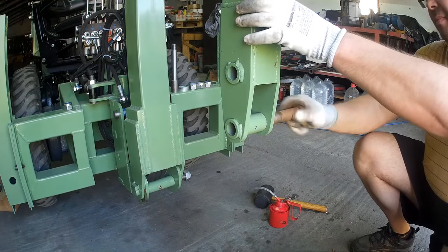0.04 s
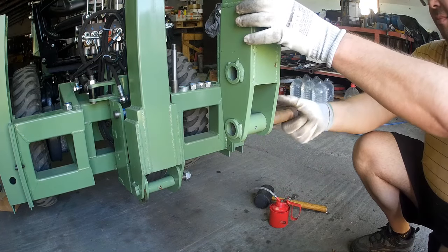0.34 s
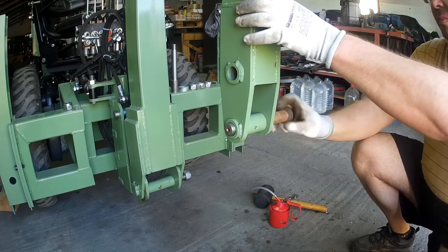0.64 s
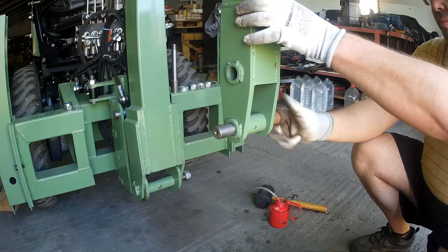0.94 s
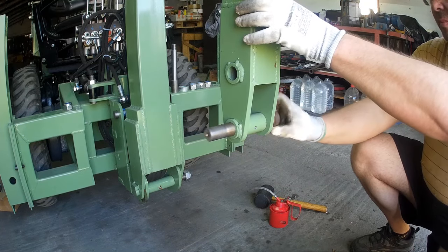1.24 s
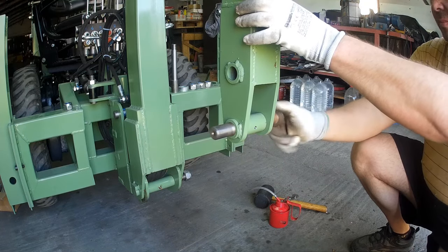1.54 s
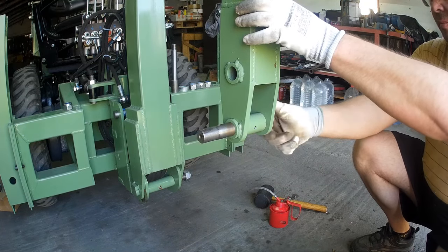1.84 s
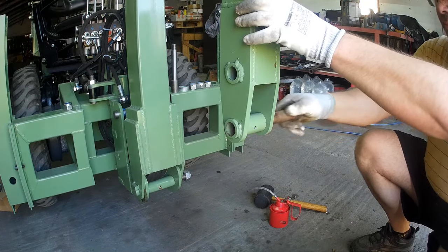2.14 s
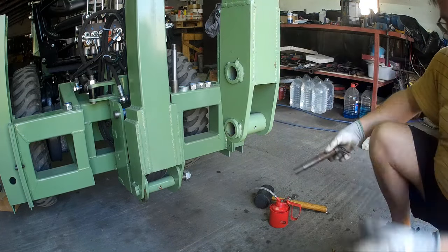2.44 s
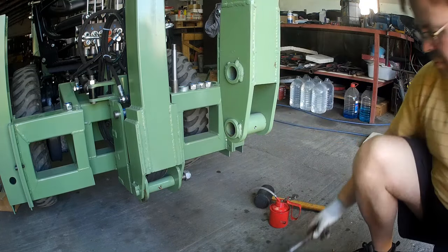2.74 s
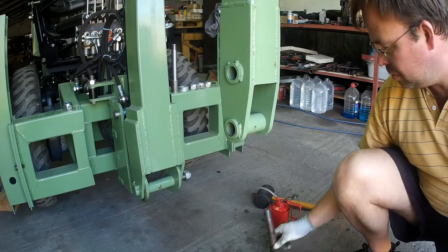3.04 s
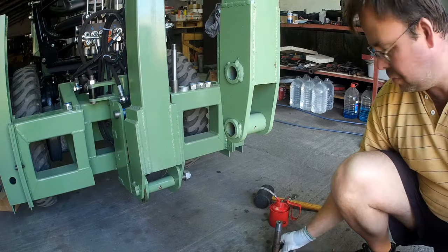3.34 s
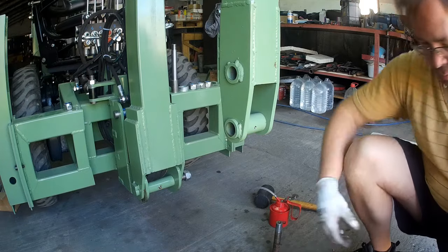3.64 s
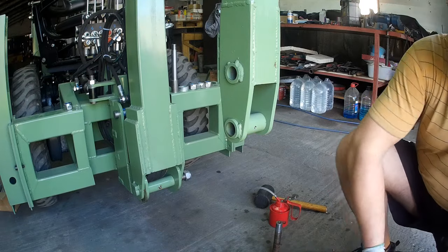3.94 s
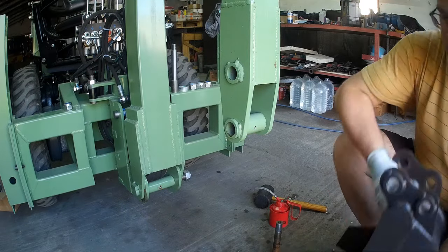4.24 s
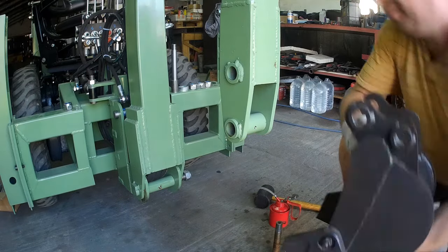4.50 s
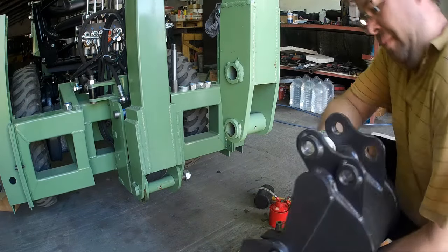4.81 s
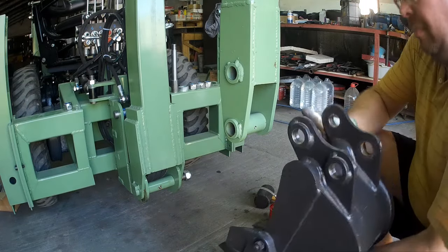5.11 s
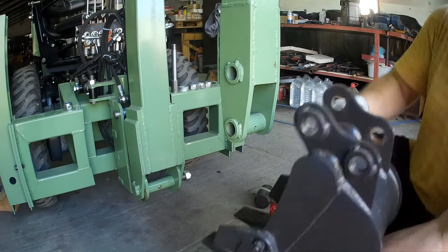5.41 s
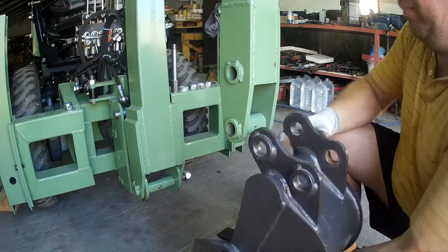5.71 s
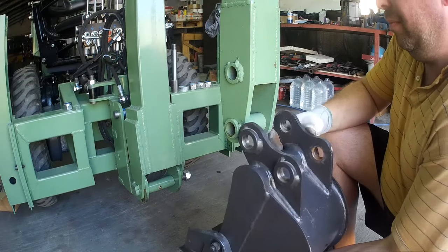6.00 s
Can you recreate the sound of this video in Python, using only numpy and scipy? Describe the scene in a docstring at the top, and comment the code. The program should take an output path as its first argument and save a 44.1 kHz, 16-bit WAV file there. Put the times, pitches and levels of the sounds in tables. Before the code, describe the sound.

A steel pin scrapes and taps faintly in its bore, then a heavy steel bucket knocks once with a short ring.

```python
"""A workshop with little echo, one microphone close to the work, a steady low rush and fine hiss behind. A
steel drift pushes a pivot pin out of a digger arm: it scrapes in the bore, taps twice, muffled, and clinks as
it comes free at 2.2 s. Shoes shuffle on the floor. At 4 s a heavy steel bucket is picked up: it rocks with two
soft knocks, then knocks hard with a short ring of its plates, drags its edge faintly on the concrete, knocks
lightly at 4.7 s and again, harder, at 5.56 s, and bumps softly as it is carried over."""
import sys
import numpy as np
from scipy import signal
from scipy.fft import rfft, irfft, next_fast_len
from scipy.io import wavfile
from scipy.ndimage import map_coordinates

SR = 44100
rng = np.random.default_rng(int(sys.argv[2]) if len(sys.argv) > 2 else 0)


def generate_wav(sig):
    """Save sig (samples, or channels by samples) to the path in sys.argv[1] as 16-bit PCM at SR."""
    pcm = np.round(np.clip(np.atleast_2d(sig).T, -1, 1) * 32767).astype(np.int16)
    wavfile.write(sys.argv[1], SR, pcm)


N = 276020

# The steel drift's modes in the bore. Each row: frequency in Hz, level in dB, t60 in seconds.
DRIFT_MODES = [(1582, -6.5, .045), (1880, -11, .045), (2130, -13, .04), (2305, -3, .08), (2480, -7, .035),
               (2600, -3, .045), (2800, -9, .035), (3080, -11, .05), (3250, -8, .04), (3480, -13, .04),
               (3700, -12, .04), (4940, -15, .05), (5200, -17, .04), (6100, -16, .05), (6610, -19, .05),
               (7100, -18, .05), (7490, -13, .045), (7770, -15, .05), (8100, -17, .05), (8570, -17, .05)]
MOUTH_S = 2.14  # the drift reaches the mouth of the bore


def amp(db):
    """Decibels to gain."""
    return 10 ** (np.asarray(db) / 20)


def unit(x):
    """x at rms 1."""
    return x / np.sqrt(np.mean(x ** 2) + 1e-20)


def along(points, hz):
    """Read a curve of (Hz, value) points on a log frequency axis."""
    point_hz, values = np.transpose(points)
    return np.interp(np.log(hz + 1), np.log(point_hz + 1), values)


def add(track, start_s, sound):
    """Mix a sound into the track from start_s on."""
    part = track[max(round(start_s * SR), 0):][:len(sound)]
    part += sound[:len(part)]


def filtered(x, response):
    """Shape x by a gain that is a function of frequency in Hz."""
    size = next_fast_len(len(x) + SR // 4)
    hz = np.fft.rfftfreq(size, 1 / SR)
    return irfft(rfft(x, size) * response(hz), size)[:len(x)]


def softened(x, cut_hz):
    """A soft contact passes no highs."""
    return signal.sosfilt(signal.butter(4, min(cut_hz, SR / 3), fs=SR, output="sos"), x)


def burst(t60):
    """A second of noise that dies away."""
    return rng.standard_normal(SR) * amp(-60 * np.arange(SR) / SR / t60)


def ring(modes, tilt_db, scatter_db, rise_cycles):
    """Damped modes, each swelling over its first cycles, at slightly new strengths for every blow."""
    t = np.arange(SR) / SR
    hz, db, t60 = np.transpose(modes)[:, :, None]
    db = db + tilt_db * np.log2(hz / np.median(hz)) + scatter_db * rng.standard_normal(hz.shape)
    rise = 1 - np.exp(-t * hz / rise_cycles)
    swings = amp(db - 60 * t / t60) * rise * np.sin(2 * np.pi * hz * t)
    return (-1) ** np.arange(len(modes)) @ swings  # neighbouring rows start in opposite directions


def room_tone(level_db=-56, wander_db=-0.07):
    """The workshop's steady low rush and fine hiss, wandering very slightly in level."""
    # The background's spectrum. Each row: frequency in Hz, relative density in dB.
    spectrum = [(12, -36), (20, -7), (38, -3.5), (70, -2), (98, -2), (196, -0.5), (306, -0.5), (452, -2),
                (491, -3), (534, -2.5), (881, -6), (2210, -15.5), (2540, -17), (3750, -22), (5500, -24.3),
                (9000, -26.4), (15500, -27.5)]
    wander = map_coordinates(rng.standard_normal(32), [np.arange(N) * 3 / SR], mode="mirror")
    rush = filtered(rng.standard_normal(N), lambda hz: amp(along(spectrum, hz)))
    return amp(level_db + wander_db * wander) * unit(rush)


def slips(length_s, grain_db, catch_db, catches_per_s=164):
    """Friction over one stroke: uneven slips that swell and fade, clumping where the faces catch."""
    t = np.arange(SR // 2) / SR
    catches = map_coordinates(rng.standard_normal(256), [t * catches_per_s], mode="mirror")
    noise = rng.standard_normal(len(t))
    roughness = amp(grain_db * rng.standard_normal(len(t)) + catch_db * catches)
    return unit(noise * roughness) * np.sin(np.pi * np.minimum(t / length_s, 1))


def rubbed(friction, ringing):
    """A body sings along with the friction that excites it."""
    return signal.fftconvolve(friction, ringing / np.linalg.norm(ringing))[:len(friction)]


def chatter(friction, tilt_db, ring_db, hiss_db):
    """Tiny slips excite the drift's modes, with the hiss of the rubbing faces between them."""
    # Steel rubbing on steel. Each row: frequency in Hz, relative density in dB.
    spectrum = [(700, -30), (1550, -4), (3650, 0), (4200, -12), (5250, -13), (6100, -16), (6900, -10.5),
                (8100, -10), (10000, -29), (15000, -60)]
    ringing = ring(DRIFT_MODES, tilt_db, scatter_db=1.5, rise_cycles=.8)
    hiss = filtered(friction, lambda hz: amp(along(spectrum, hz) + tilt_db * np.log2(hz / 3500 + 0.37)))
    return amp(ring_db) * rubbed(friction, ringing) + amp(hiss_db) * hiss


def drift_scrapes(rim_db=-7):
    """Each twist rasps in the bore; at the mouth the drift also drags over the rim and rings it."""
    # The hand's uneven twists. Each row: middle and length in seconds, level in dB, tilt in dB per octave.
    twists = [(0.008, 0.032, -58.5, -2.5), (0.106, 0.03, -59, 0.5), (0.173, 0.035, -57, -3),
              (.385, .05, -65, -4), (0.546, .06, -64, 0), (.75, .06, -62, -5), (1.125, 0.087, -59, -5),
              (1.285, 0.059, -57.5, -2), (1.333, 0.041, -59, -7), (1.37, 0.059, -60, -2),
              (1.418, 0.051, -57.5, -1.5), (1.47, .04, -65.5, -4), (1.517, 0.049, -59.5, 2.5),
              (1.547, 0.062, -59.5, 0.5), (1.627, 0.055, -57.5, -2.5), (1.719, 0.042, -58, 3),
              (1.749, 0.035, -57.5, -6), (1.81, 0.079, -57.5, 1), (2.008, 0.06, -60, 3),
              (2.038, 0.06, -59.5, -1), (2.171, 0.027, -57, -8), (2.184, 0.035, -57.5, 6.5),
              (2.206, 0.034, -58.5, 4.5), (2.25, .028, -56, 7)]
    # The rim of the bore. Each row: frequency in Hz, relative level in dB, t60 in seconds.
    rim_modes = [(3600, -3, .015), (5180, 1, .02), (5380, 2, .025), (5930, -2, .02), (7480, -2, .035),
                 (8010, -3, .035), (8600, -6, .03)]
    out = np.zeros(N)
    for middle_s, length_s, db, tilt_db in twists:
        friction = slips(length_s, grain_db=3.5, catch_db=1.5)
        rasp = chatter(friction, tilt_db, ring_db=-11, hiss_db=8)
        if middle_s > MOUTH_S:
            rim = ring(rim_modes, tilt_db=0, scatter_db=1, rise_cycles=2)
            rasp += amp(rim_db) * rubbed(friction, rim)
        add(out, middle_s - length_s / 2, amp(db) * rasp)
    return out


def drift_taps(bore_cut_hz=3000, free_cut_hz=13000):
    """The drift hits the bore with a muffled tick and rattles briefly; once free, its tip rings high."""
    # The drift's contacts. Each row: start in seconds, level in dB, tilt in dB per octave,
    # tip ring in dB relative to that level.
    contacts = [(1.1906, -47.3, -4.5, -38), (1.8615, -47, -2.5, -30), (1.8675, -54, -2, -30),
                (2.2319, -49.5, -.5, 5), (2.2465, -56, 4, -6)]
    # The drift's tip. Each row: frequency in Hz, level in dB, t60 in seconds.
    tip_modes = [(3432, -5, .075), (6848, 1, .15), (7490, -17, .08)]
    out = np.zeros(N)
    for start_s, db, tilt_db, tip_db in contacts:
        cut_hz = bore_cut_hz if start_s < MOUTH_S else free_cut_hz
        blow = softened(ring(DRIFT_MODES, tilt_db, scatter_db=1, rise_cycles=1.5), cut_hz)
        tip = amp(tip_db) * ring(tip_modes, tilt_db=0, scatter_db=1, rise_cycles=3)
        rattle = chatter(burst(t60=0.075), tilt_db, ring_db=-7, hiss_db=7)
        add(out, start_s, amp(db) * (blow + tip + rattle))
    return out


def floor_bumps(rise_s=0.0061):
    """Shoes and load bump and shuffle on the floor: low thuds with no ring."""
    # The thuds. Each row: start in seconds, level in dB, cut-off in Hz, t60 in seconds.
    thuds = [(2.7, -56, 330, 0.32), (3.245, -51, 352, 0.32), (3.36, -54.5, 350, .7),
             (4.109, -44, 120, 0.14), (4.721, -52, 260, 0.17), (5.573, -47.5, 120, 0.16)]
    out, t = np.zeros(N), np.arange(SR) / SR
    for start_s, db, cut_hz, t60 in thuds:
        rumble = unit(softened(rng.standard_normal(SR), cut_hz))
        envelope = amp(db - 60 * t / t60) * (1 - np.exp(-t / rise_s))
        add(out, start_s, rumble * envelope)
    return out


def bucket_knocks(soft_cut_hz=346, hard_cut_hz=3250, fringe_db=-17):
    """Each blow ticks and rings the plates; grit under the edge crunches, with a faint bright fringe."""
    # The welded plates, damped by the hands. Each row: frequency in Hz, level in dB, t60 in seconds.
    # Close twin modes beat, so the low ring swells after the blow.
    plate_modes = [(146, -31.5, .29), (192, -26, .12), (230, -17, .09), (312, -7.2, .044), (494, -40, .186),
                   (570, -13.6, .023), (626, -49.8, 1.33), (695, -17, .052), (800, -24, .03),
                   (807, -52.5, .82), (971, -24.5, .054), (1085, -31, .042), (1405, -36, .034),
                   (1520, -44.5, .33), (1840, -37, .03), (2003, -47, .28), (2285, -57, .25),
                   (2400, -34, .033), (2431, -51.7, .27), (2563, -51, .22), (2702, -42, .17),
                   (2834, -49, .11), (2982, -45.5, .3), (3117, -53.4, .2), (3221, -44.3, .21),
                   (627.25, -49.8, 1.33), (808.7, -52.5, .82)]
    # Blows on the bucket. Each row: start in seconds, then the levels of plates, crunch and tick in dB.
    blows = [(4.068, -24.5, -73, -65), (4.081, -24, -58, -65), (4.1108, 0, -41, -38),
             (4.718, -34, -59, -56), (5.5648, -24.5, -55, -33.5), (5.5724, -42, -57, -35),
             (5.5775, -35, -62, -43)]
    # The edge's tick on concrete. Each row: frequency in Hz, relative density in dB.
    tick_spectrum = [(250, -25), (580, 1), (1150, -4), (1550, 2), (2300, 3), (2650, -4), (3500, -4),
                     (4000, -12), (4600, -28), (15000, -50)]
    out = np.zeros(N)
    grit_band = signal.butter(8, [400, 3400], "band", fs=SR, output="sos")
    for start_s, db, crunch_db, tick_db in blows:
        cut_hz = soft_cut_hz + (hard_cut_hz - soft_cut_hz) * amp(db) ** 2  # harder blows are brighter
        plates = softened(ring(plate_modes, tilt_db=0, scatter_db=.3, rise_cycles=.6), cut_hz)
        grit = signal.sosfilt(grit_band, burst(t60=0.15))
        fringe = amp(fringe_db) * softened(burst(t60=.13), cut_hz=8000)
        tick = filtered(burst(t60=0.014), lambda hz: amp(along(tick_spectrum, hz)))
        add(out, start_s, amp(db) * plates + amp(crunch_db) * (grit + fringe) + amp(tick_db) * tick)
    return out


def bucket_drags(width_hz=250):
    """As the bucket lifts, its edge rasps faintly on the concrete, in a narrow band."""
    # The edge's strokes. Each row: middle and length in seconds, level in dB, band centre in Hz.
    strokes = [(4.381, .07, -64, 2370), (4.488, 0.037, -65, 1730)]
    out = np.zeros(N)
    band_gain = np.sqrt(SR / 2 / width_hz)
    for middle_s, length_s, db, centre_hz in strokes:
        friction = slips(length_s, grain_db=3, catch_db=-2)
        rasp = filtered(friction, lambda hz: np.exp(-((hz - centre_hz) / width_hz) ** 2))
        add(out, middle_s - length_s / 2, amp(db) * band_gain * rasp)
    return out


def workshop_reverb(x, delay_s=0.011):
    """The room's diffuse answer; each frequency dies at its own speed."""
    # The room's decay. Each row: frequency in Hz, t60 in seconds.
    decay_times = [(150, 0.17), (1000, 0.11), (8000, 0.23)]
    hz, t, noise = signal.stft(rng.standard_normal(SR // 2), SR, nperseg=256)
    decay = amp(-60 * t / along(decay_times, hz)[:, None])
    tail = signal.istft(noise * decay, SR, nperseg=256)[1]
    delayed = np.pad(x, (round(delay_s * SR), 0))
    return signal.fftconvolve(delayed, tail / np.linalg.norm(tail))[:N]


def scene():
    """The work heard close up, in mono, with a little of the room behind it."""
    heavy = bucket_knocks() + floor_bumps()
    light = drift_taps() + drift_scrapes() + bucket_drags()
    reverb = workshop_reverb(amp(-25) * heavy + amp(-16) * light)
    return (heavy + light + reverb + room_tone())[None]


def record(dry, top_hz=15750):
    """The microphone's chain passes nothing above its band limit."""
    return filtered(dry[0], lambda hz: hz < top_hz)[None]


dry = scene()
out = record(dry)
generate_wav(out)
```